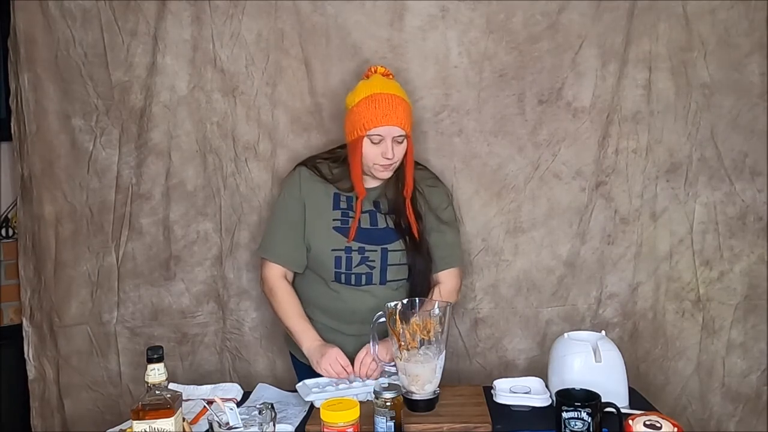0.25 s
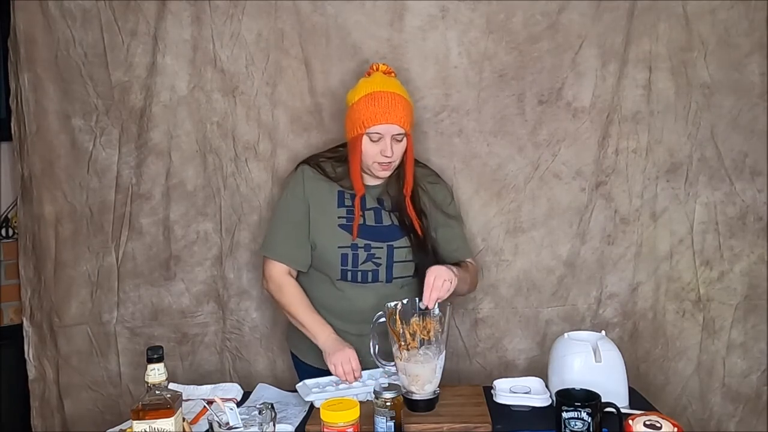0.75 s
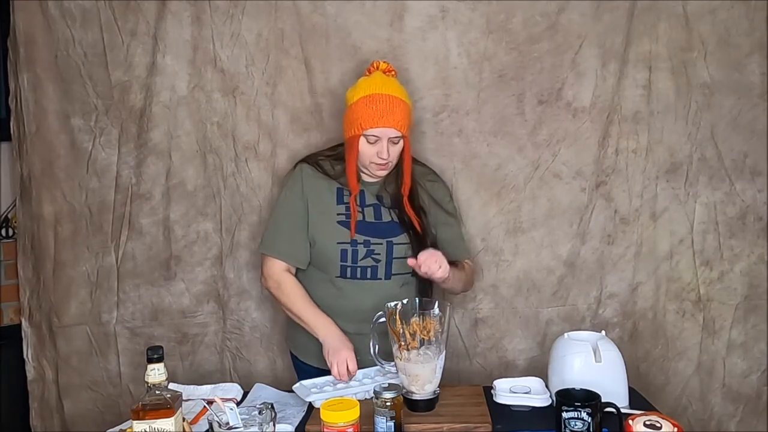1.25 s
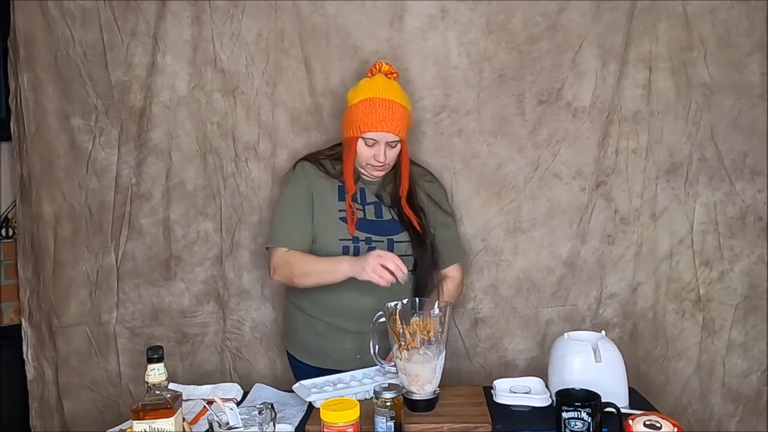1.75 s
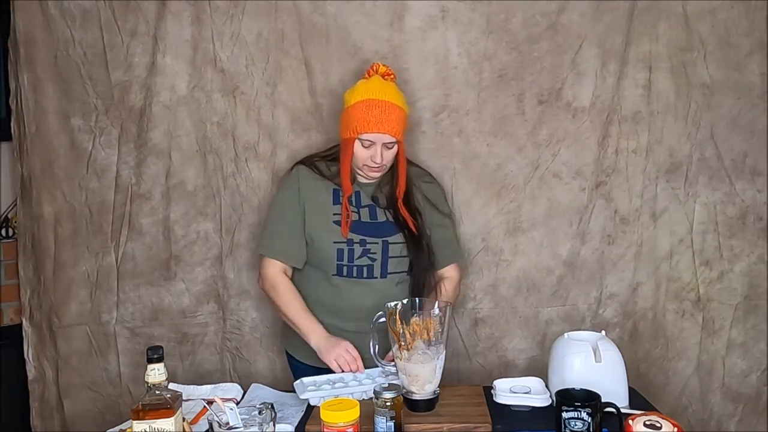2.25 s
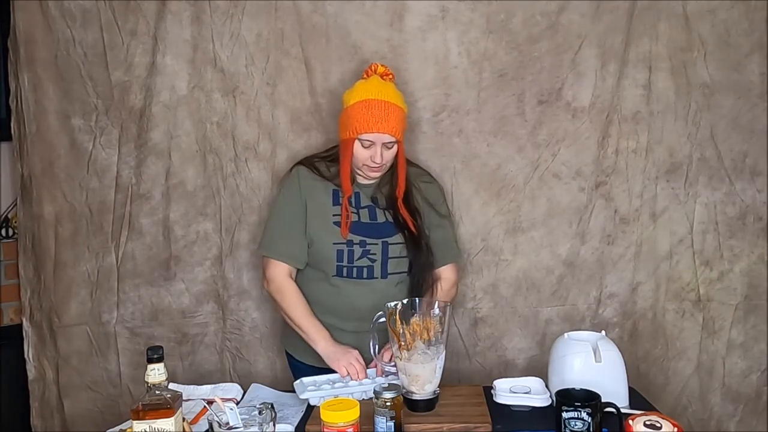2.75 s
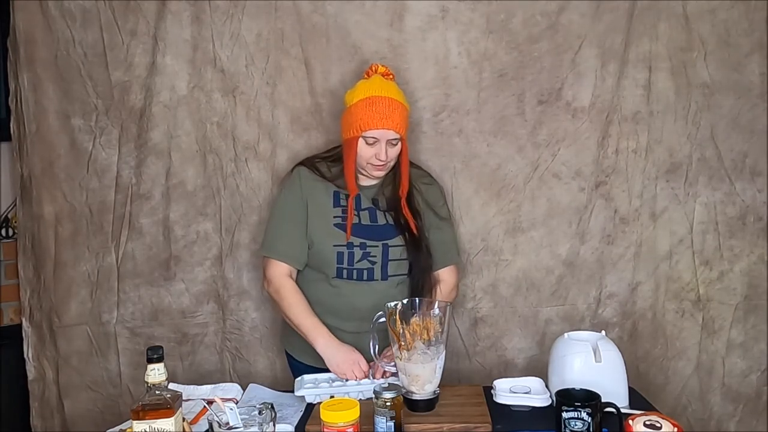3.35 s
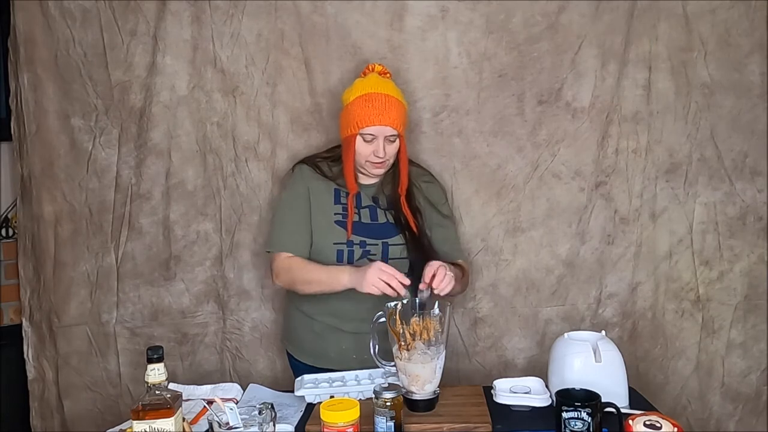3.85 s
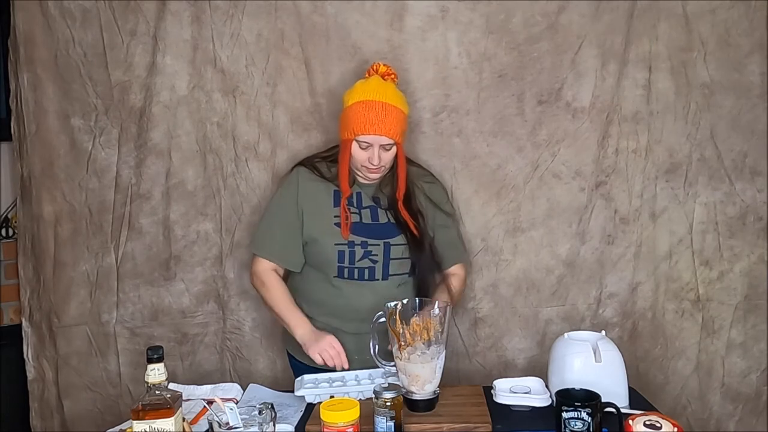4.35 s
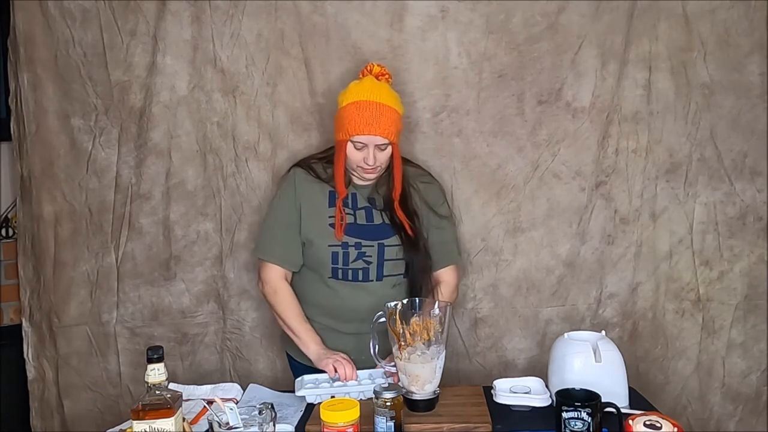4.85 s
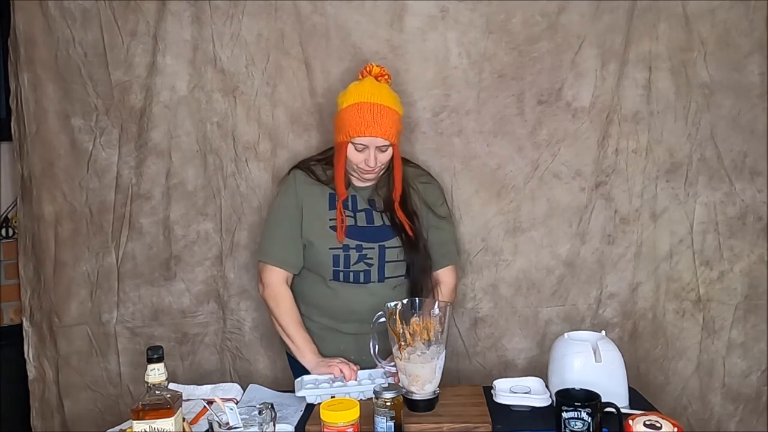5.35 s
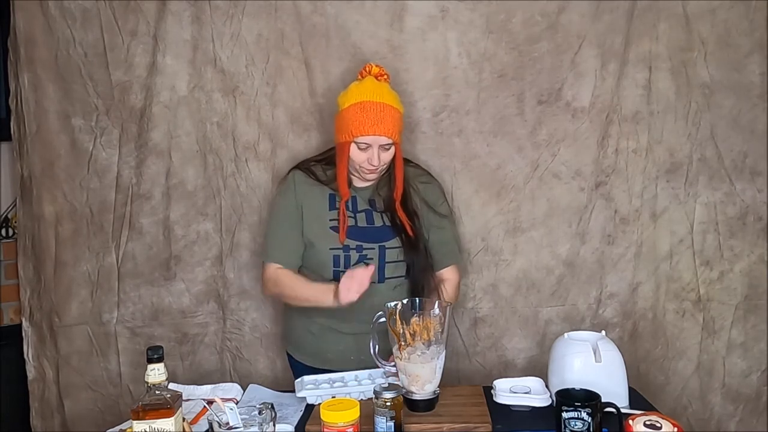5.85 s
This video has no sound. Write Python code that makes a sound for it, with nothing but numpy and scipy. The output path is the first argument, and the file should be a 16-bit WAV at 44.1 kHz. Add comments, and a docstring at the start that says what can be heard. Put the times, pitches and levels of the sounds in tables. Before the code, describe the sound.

Plastic ice tray crackles and ticks under working fingers; three cubes plop hard into a wet, hollow jar, in a small humming kitchen.

```python
"""Ice cubes are pried out of a plastic tray and dropped into a part-filled blender jar, in a small kitchen.
The tray clicks, crunches and scrapes: impacts and stick-slip, as pulses and noise, excite its resonances.
Three times a cube lands hard in the jar, where a strike, a splash and ringing air pockets overlap;
weaker contacts follow each landing. A low appliance hum and dull air noise lie under it all.
A diffuse echo surrounds the handling, and two close microphones hear the scene."""
import sys
import numpy as np
from scipy import signal
from scipy.fft import rfft, irfft
from scipy.io import wavfile

SR = 44100
rng = np.random.default_rng(int(sys.argv[2]) if len(sys.argv) > 2 else 0)


def put_to_file(sound):
    """Save the sound as 16-bit audio at rate SR, in the file named by the first command-line argument."""
    columns = np.atleast_2d(sound).T  # one column per channel
    safe = np.clip(columns, -1, 1)
    whole_steps = np.round(safe * 32767)
    wavfile.write(sys.argv[1], SR, whole_steps.astype(np.int16))


N = 268569
SIZE = 8192  # samples of a short sound
T, HZ = np.arange(SIZE) / SR, np.fft.rfftfreq(SIZE, 1 / SR)

# loudest knocks of ice in the tray:
# (time [s], relative level [dB], relative body gain [dB], relative treble gain [dB])
KNOCKS = [(0.186, -25, -5.5, -18), (0.373, -30.5, -4, -21), (0.4, -18.5, -5.5, -15),
          (0.521, -27.5, -8.5, -37), (0.589, -20.5, -2.5, -17.5), (0.613, -15, -10, -17.5),
          (0.751, -34.5, -5, -19), (0.859, -26.5, -6.5, -34), (0.902, -31, 19, -33),
          (1.136, -26.5, -30, -24), (1.271, -25, 1, -20.5), (1.282, -26, -15.5, -17.5),
          (1.346, -27.5, -16, -36), (1.409, -31, -19, -27), (2.476, -28, -12, -11.5), (2.509, -23, -9, -45),
          (2.537, -24.5, -15, -9.5), (2.615, -24, -22.5, -27), (2.656, -27.5, -15.5, -21),
          (2.76, -29, -13, -20), (2.96, -33.5, -28, -24), (3.014, -26.5, -17.5, -28),
          (3.231, -32.5, -8.5, -13), (3.321, -30.5, -7, -16), (3.544, -34.5, -10, -22),
          (3.682, -34, -23, -9), (4.775, -31.5, -13.5, -12.5), (4.913, -18.5, -29, -23.5),
          (5.066, -10.5, -14.5, -13), (5.094, -13, -6.5, -19), (5.12, -19, -17, -17.5),
          (5.279, -19.5, -22, -22), (5.323, -18.5, -17, -19), (5.384, -15.5, -16, -27),
          (5.514, -23, -28.5, -27), (5.636, -29.5, -16.5, -45)]
# a cube falls into the jar, or bobs up and knocks again; the row at 4.274 s is a faint bright tick,
# likely ice slipping in the fingers: (time [s], relative level [dB],
# splash length [s], relative treble tilt [dB per octave], relative plop level [dB])
JAR_EVENTS = [(1.0756, -18, .013, -1, -10), (1.205, -40, .01, -4, -9), (1.382, -35.5, .014, -3, -12),
              (2.0109, -14.5, 0.038, -.5, -12.5), (2.118, -34.5, 0.0027, -3.5, -16),
              (2.171, -44, 0.0082, -3, -5), (2.235, -44.5, 0.0093, -7, -16), (4.07, -13, .041, 0, -7),
              (4.141, -28.5, 0.06, -3.5, -11), (4.213, -25, 0.016, -6, -16), (4.274, -37, 0.0049, 2.5, -16)]
# broad spectrum of the tray: (frequency [Hz], relative gain [dB])
TRAY_SPECTRUM = [(100, -13), (250, -16.5), (450, -17), (680, -16), (950, -0.5), (1400, -0.5), (1950, -1.5),
                 (2600, -3), (3700, -5), (5000, -3.5), (6500, -10.5), (9000, -13.5), (12000, -23.5),
                 (15500, -39)]
# resonances of the tray: (frequency [Hz], width [Hz], gain above the broad spectrum [dB])
TRAY_RESONANCES = [(1025, 9.6, 4), (1100, 41, 3.5), (1377, 98, 4), (1536, 140, 0), (2380, 230, 2.5),
                   (3250, 32, 6), (3160, 120, 3.5), (4540, 270, 2), (4960, 140, -1), (5300, 80, 0),
                   (8700, 520, 4)]


def amp(db):
    """Level law: decibels to amplitude gain."""
    return 10 ** (np.asarray(db) / 20)


def unit(x):
    """Energy normalisation: scales the sum of squares to one."""
    return x / np.sqrt(np.sum(x ** 2) + 1e-20)


def read(points, hz):
    """Logarithmic frequency scale: interpolates a table along it."""
    f, value = np.transpose(points)
    return np.interp(np.log(hz + 1), np.log(f), value)


def add(mix, s, sound):
    """Superposition: mixes a sound in at time s."""
    part = mix[max(round(s * SR), 0):][:len(sound)]
    part += sound[:len(part)]


def fade(t60, t=T):
    """Exponential damping: falls by 60 dB in t60 seconds."""
    return np.exp(-np.log(1000) * t / np.maximum(t60, 1e-4))


def body(spectrum, modes):
    """Modal response: the gain in dB of a broad spectrum with resonance peaks on top."""
    peaks = sum(db / (1 + (2 * (HZ - hz) / width) ** 2) for hz, width, db in modes)
    return read(spectrum, HZ) + peaks


def colour(x, db):
    """Causality: passes x through the minimum-phase filter that has this gain in dB."""
    log_gain = np.log(amp(np.r_[db, db[-2:0:-1]]))
    # log gain and phase of a minimum-phase filter are a Hilbert pair
    response = np.fft.ifft(np.exp(np.conj(signal.hilbert(log_gain)))).real
    return signal.oaconvolve(x, response[:SIZE // 2])[:len(x)]


def tilt(db_per_octave):
    """Contact hardness: a harder contact tilts the spectrum towards the treble."""
    return db_per_octave * np.log2(np.clip(HZ, 700, 12000) / 2500)


def spot(depth_db, count=14):
    """Place-dependent mode excitation: each place on the tray has its own random gain in dB."""
    places = np.linspace(np.log(800), np.log(12000), count)
    return np.interp(np.log(HZ + 1), places, depth_db * rng.standard_normal(count))


def grains(size, per_s, spread_db):
    """Random point process: tiny slips at random moments, a few much larger than the rest."""
    levels = spread_db * np.minimum(rng.exponential(1, size), 4)
    pulses = amp(levels) * rng.choice([-1, 1], size)
    return pulses * (rng.random(size) < per_s / SR)


def blow(rattle_db, rattle_t60, swell_s):
    """Impact: one sharp contact, then the dense rattle that spreads through the struck wall and dies."""
    rattle = rng.standard_normal(SIZE) * fade(rattle_t60) * (1 - np.exp(-T / swell_s))
    return unit(signal.unit_impulse(SIZE) + amp(rattle_db) * unit(rattle))


def run_of_slips(length, per_s):
    """Stick-slip: slips build up, go on for a given time [s] and then die away."""
    release = fade(0.041, np.maximum(T - length, 0))
    grip = (1 - np.exp(-T / 0.006)) * release
    return unit(grains(SIZE, per_s, spread_db=2.5) * grip)


def note(hz, t60, rise_s, glide=0):
    """Damped oscillator: a dying tone with a soft start; its pitch may rise by a share per second."""
    tone = np.sin(2 * np.pi * hz * (T + glide * T ** 2 / 2))
    return tone * fade(t60) * (1 - np.exp(-T / rise_s))


def noise_pair(size):
    """Diffuse-field coherence: noise spectra at two close microphones, and their frequencies [Hz]."""
    # likeness of the microphones: (frequency [Hz], coherence [0-1])
    likeness = [(60, 0.58), (200, 0.82), (700, 0.4), (1400, 0.86), (2800, 0.21), (5500, 0.53), (11000, .3)]
    hz = np.fft.rfftfreq(size, 1 / SR)
    same = np.clip(read(likeness, hz), 0, 1)
    common, apart = rfft(rng.standard_normal((2, size)))
    opposed = np.array([[1], [-1]]) * apart * np.sqrt((1 - same) / 2)
    return common * np.sqrt((1 + same) / 2) + opposed, hz


def background(air_db=-58, hum_hz=58.2, waver_db=-17, waver_hz=5):
    """Tonal and broadband noise: a motor hum wavers by narrow-band noise over the dull air of the room."""
    # air noise: (frequency [Hz], relative level [dB])
    air_spectrum = [(20, -8), (30, -1.5), (42, -11), (75, -6.5), (110, -10.5), (190, -13), (260, -22),
                    (390, -25), (600, -31.5), (1300, -35), (2200, -39.5), (5000, -46.5), (9000, -53),
                    (15000, -79.5)]
    # motor hum: (time [s], level [dB])
    hum_level = [(0.0, -45.5), (1.54, -48), (4.9, -45), (5.83, -48), (6.09, -46)]
    # weak companion tones: (frequency [Hz], level [dB])
    hum_lines = [(26.9, -72), (117.5, -74), (388, -79.5)]
    t = np.arange(N) / SR
    noise, hz = noise_pair(N)
    air = amp(air_db) * unit(irfft(noise * amp(read(air_spectrum, hz)), N)) * np.sqrt(2 * N)
    narrow_band = np.exp(-((hz - hum_hz) / (2 * waver_hz)) ** 2)
    waver = unit(irfft(noise[0] * narrow_band, N)) * np.sqrt(N)
    motor = np.sqrt(2) * np.sin(2 * np.pi * hum_hz * t) + amp(waver_db) * waver
    lines = sum(amp(db) * np.sqrt(2) * np.sin(2 * np.pi * (f * t + rng.random())) for f, db in hum_lines)
    return air + lines + motor * amp(np.interp(t, *np.transpose(hum_level)))


def kitchen(x, wet_db=0, build_s=0.0017, drift_per_s=35, count=7):
    """Reverberation: table and walls return a diffuse decaying echo, whose pattern keeps changing."""
    # reverberation time: (frequency [Hz], t60 [s])
    reverberation = [(150, .3), (600, .21), (1500, .21), (4000, .195), (9000, .165), (15000, .12)]
    out, size = np.zeros((2, N)), SR * 2 // 5
    for k in range(count):
        hz, t, z = signal.stft(irfft(noise_pair(size)[0], size), SR, nperseg=256)
        decay = fade(read(reverberation, hz)[:, None], t)
        tail = signal.istft(z * decay * (1 - np.exp(-t / build_s)), SR, nperseg=256)[1]
        # neighbouring echo patterns cross-fade at constant power
        turn = (drift_per_s * np.arange(N) / SR - k) % count
        share = np.sin(np.pi / 2 * np.minimum(turn, 2))
        out += signal.fftconvolve((x * share)[None], unit(tail) * np.sqrt(2), axes=1)[:, :N]
    return amp(wet_db) * out


def fingers(level_db=14):
    """Sliding friction: wet ice slips on skin in a soft swell of fine noise with a high resonance."""
    # slips: (time [s], relative level [dB], swell length scale [s])
    finger_slips = [(1.915, -59.5, 0.01), (4.355, -61.5, 0.014), (5.829, -42, 0.019), (5.933, -47.5, 0.054)]
    # friction spectrum: (frequency [Hz], relative gain [dB])
    wet_ice = [(1500, -20), (4200, -12), (5000, 0), (5700, -14), (7500, -12), (10000, -22), (15000, -38)]
    out = np.zeros(N)
    for s, db, length in finger_slips:
        swell = (T / length) ** 2 * np.exp(-4 * T / length)
        friction = colour(rng.standard_normal(SIZE) * swell, read(wet_ice, HZ))
        add(out, s, amp(db + level_db) * unit(friction))
    return out


def tray_bumps(level_db=14, t60=0.091):
    """Forced response: the table answers a push on the tray with a short, dull thud."""
    # pushes: (time [s], relative level [dB])
    pushes = [(.521, -40.5), (0.575, -40), (0.613, -33.5), (1.288, -39), (2.988, -43.5), (4.567, -46),
              (5.09, -33.5), (5.391, -39.5)]
    dull = read([(70, -27.0), (130, 1.5), (270, -1.5), (450, -10.5), (800, -23.5), (2000, -49.0)], HZ)
    out = np.zeros(N)
    for s, db in pushes:
        thud = colour(rng.standard_normal(SIZE) * fade(t60), dull)
        add(out, s, amp(db + level_db) * unit(thud))
    return out


def plops(level_db=1, cycles=40, size_spread=0.028, closes_at=.75, gulp_hz=245, gulp_db=-22.5):
    """Bubble resonance: an air pocket closes late in each splash and rings upward; the jar gulps low."""
    # air pocket behind a sinking cube: (nominal frequency [Hz], relative level [dB])
    pocket = [(572, 1), (776, -15), (1010, -8)]
    out = np.zeros(N)
    chances = rng.standard_normal((len(JAR_EVENTS), len(pocket)))
    for (s, db, length, _, plop_db), chance in zip(JAR_EVENTS, chances):
        for (hz, share_db), detune in zip(pocket, 1 + size_spread * chance):
            ring = note(hz * detune, t60=cycles / hz, rise_s=0.0048, glide=0.47)
            # closes_at is the share of the splash that passes before the liquid covers the cube
            add(out, s + closes_at * length, amp(db + plop_db + share_db + level_db) * ring)
        gulp = note(gulp_hz, t60=cycles / gulp_hz, rise_s=0.0079)
        # longer splashes gulp louder; 0.033 s is the reference length
        add(out, s + 0.0077, amp(db + gulp_db) * length / 0.033 * gulp)
    return out


def jar(level_db=14, splash_db=3, bubbles_db=-8, settle_db=-28, count=10):
    """Impact on a resonant vessel: strike, splash and small bubbles sound, then the froth settles."""
    # broad spectrum of the splash: (frequency [Hz], relative gain [dB])
    splash_spectrum = [(100, -10.5), (250, -17), (420, -8.5), (650, -1.5), (1000, -3.5), (1300, -7),
                       (1750, -1.5), (2300, -4.5), (3400, -6), (5200, -9.5), (6500, -15), (9000, -20),
                       (12000, -35), (15500, -47)]
    # resonances of the jar: (frequency [Hz], width [Hz], gain above the broad spectrum [dB])
    jar_resonances = [(246, 35, 6), (580, 70, 7), (770, 60, 3), (1000, 80, 5), (1650, 60, 5), (1830, 70, 3),
                      (2390, 110, 5), (3060, 100, 3), (3470, 70, 4)]
    out, t = np.zeros(N), np.arange(SR) / SR
    hollow = body(splash_spectrum, jar_resonances)
    for s, db, length, slope, _ in JAR_EVENTS:
        impact = blow(rattle_db=5.0, rattle_t60=0.018, swell_s=.002)
        strike = unit(colour(impact, hollow + tilt(slope + 4.2)))
        splash = unit(colour(run_of_slips(length, per_s=1700), hollow + tilt(slope - .8)))
        bubbles = np.zeros(SIZE)
        for when, pitch in rng.random((count, 2)):
            add(bubbles, .006 + when * length, note(510 * 1.8 ** pitch, .02, rise_s=.001))
        event = strike + amp(splash_db) * splash + amp(bubbles_db) * unit(bubbles)
        add(out, s, amp(db + level_db) * unit(event))
        froth = colour(rng.standard_normal(SR) * fade(1.6, t), hollow + tilt(-3))
        add(out, s, amp(db + level_db + settle_db) * unit(froth))
    return out


def handling_force():
    """Friction follows force: how hard the fingers work in the tray, as a gain over time."""
    # one list for each spell of sliding: (time [s], relative level [dB])
    spells = [
        [(0.0, -49.5), (0.3, -55.5), (0.56, -46), (0.72, -54), (1.254, -51.5), (1.372, -52), (1.504, -61.5),
         (1.58, -99)],
        [(2.55, -46.5), (2.7, -52), (2.85, -49.5), (3.2, -52), (3.62, -54), (3.846, -59), (3.92, -102)],
        [(5.2, -36), (5.29, -67.5), (5.5, -40), (5.78, -61.5)],
    ]
    t = np.arange(N) / SR
    return sum(amp(np.interp(t, *np.transpose(rows), left=-150, right=-150)) for rows in spells)


def tray_scrapes(level_db=-8.0, count=6):
    """Dry friction: short, gritty slips at several places on the tray crowd under the fingers."""
    tray, friction = body(TRAY_SPECTRUM, TRAY_RESONANCES) + tilt(0.65), np.zeros(N)
    for _ in range(count):
        starts = abs(grains(N, per_s=24, spread_db=4))
        slips = signal.oaconvolve(starts, fade(.035) * (1 - np.exp(-T / .002)))[:N]
        grit = slips * grains(N, per_s=1200, spread_db=3.5)
        friction += unit(colour(grit, tray + spot(depth_db=4, count=22)))
    return amp(level_db) * handling_force() * unit(friction) * np.sqrt(N)


def tray_ticks(level_db=-7, count=3):
    """Random impacts: jostling cubes knock at random moments, scaled by the handling force."""
    tray, force, ticks = body(TRAY_SPECTRUM, TRAY_RESONANCES), handling_force(), np.zeros(N)
    for _ in range(count):
        impact = blow(rattle_db=4.5, rattle_t60=.018, swell_s=0.00072)
        knock = colour(impact, tray + spot(depth_db=2))
        jolts = force * unit(grains(N, per_s=9, spread_db=3)) * np.sqrt(N / count)
        ticks += signal.oaconvolve(jolts, unit(knock))[:N]
    return amp(level_db) * ticks


def tray_rings(level_db=0, cycles=46):
    """Damped resonance: wall pops and sharp clicks ring on one note, dying by 60 dB in 46 cycles."""
    # wall pops, and short high rings that belong to sharp clicks, such as the one at 0.613 s:
    # (time [s], level [dB], frequency [Hz])
    rings = [(.379, -32, 1184), (.402, -36.5, 1250), (0.6134, -11.5, 2610), (.858, -30, 1078),
             (1.1352, -29, 3270), (2.484, -32, 1150), (2.532, -32.5, 1084), (3.232, -30, 2150),
             (4.566, -44, 983), (4.914, -19, 3170), (5.095, -23.5, 973), (5.104, -24, 928),
             (5.217, -38, 995)]
    out = np.zeros(N)
    for s, db, hz in rings:
        add(out, s, amp(db + level_db) * note(hz, cycles / hz, rise_s=0.00017))
    return out


def tray_crunches(level_db=15):
    """Stick-slip: ice grinds against the plastic as a cube comes free, each time at another place."""
    # runs of slips: (time [s], relative level [dB], length [s], treble tilt [dB per octave])
    slip_runs = [(0.131, -34, 0.04, -2), (.545, -25, 0.051, -3.5), (0.745, -38.5, 0.024, -5.5),
                 (.599, -22, 0.033, 0), (1.017, -27.5, 0.098, -3.5), (2.479, -21.5, 0.026, 0),
                 (2.534, -30.5, 0.02, -1), (2.802, -31.5, 0.031, 3), (3.033, -39, .05, -2.5),
                 (3.135, -36.5, 0.032, 3.5), (3.37, -33.5, 0.025, -1.5), (3.569, -47, 0.014, 3),
                 (3.798, -45.5, 0.022, -5), (4.664, -33, 0.04, 0.5), (4.887, -33.5, 0.02, 3.5),
                 (5.044, -14, 0.018, 2.5), (5.07, -20, 0.02, -5.5), (5.27, -26.5, 0.014, -5.5),
                 (5.382, -17.5, 0.0081, 0), (5.5, -30, 0.032, 10.5), (5.676, -38, 0.0373, -0.5)]
    out, tray = np.zeros(N), body(TRAY_SPECTRUM, TRAY_RESONANCES)
    for s, db, length, slope in slip_runs:
        shape = tray + tilt(slope) + spot(depth_db=1.2, count=20)
        crunch = colour(run_of_slips(length, per_s=1400), shape)
        add(out, s, amp(db + level_db) * unit(crunch))
    return out


def ice_snaps(level_db=25.5, landing_db=0, hard_landing_db=-21, t60=0.021):
    """Brittle fracture: cracking ice gives a bright noise burst at each knock and each hard landing."""
    bright = read([(600, -27.0), (1500, 0.5), (4500, 3.5), (6500, -5.5), (9500, -3.5),
                   (12000, -17.0), (15500, -22.0)], HZ)
    out = np.zeros(N)
    cracks = [(s, db + high_db + level_db) for s, db, _, high_db in KNOCKS]
    cracks += [(s, db + landing_db) for s, db, *_ in JAR_EVENTS if db > hard_landing_db]
    for s, db in cracks:
        snap = colour(rng.standard_normal(SIZE) * fade(t60), bright)
        add(out, s, amp(db) * unit(snap))
    return out


def tray_clicks(level_db=13, body_db=11, treble_db=11, bass_db=-5, follow=0.91, sharp_db=-22):
    """Impact excitation: knocks ring the tray's modes; gentle ones swell more slowly and rattle longer."""
    out, tray = np.zeros(N), body(TRAY_SPECTRUM, TRAY_RESONANCES)
    for s, db, low_db, high_db in KNOCKS:
        contact = read([(150, bass_db), (700, low_db + body_db), (1400, low_db + body_db),
                        (3300, 0.018), (8000, high_db + treble_db)], HZ)
        # drag runs from 0 for a hard knock to 1 for a gentle one; it is one half at sharp_db
        drag = 1 / (1 + amp(db - sharp_db) ** 2)
        knock = blow(rattle_db=11.5 + 3.1 * drag, rattle_t60=0.012 + 0.021 * drag,
                     swell_s=.0007 + 0.0036 * drag)
        # follow is the share of the contact's gain that colours the knock
        shape = tray + follow * contact + spot(depth_db=2)
        add(out, s, amp(db + level_db) * unit(colour(knock, shape)))
    return out


def scene(jar_echo_db=-2, crack_echo_db=-6):
    """Direct and reverberant sound: jar, cracks, rings and plops send less into the echo than the handling."""
    handling = tray_clicks() + tray_crunches() + tray_scrapes() + tray_ticks() + tray_bumps() + fingers()
    direct = ice_snaps() + tray_rings() + plops()
    drops = jar()
    echo = kitchen(handling + amp(jar_echo_db) * drops + amp(crack_echo_db) * direct)
    return handling + direct + drops + echo + background()


def record(dry, lag_s=.000026, edge_hz=15500):
    """Interchannel differences: the left microphone hears later and in another colour; then a low-pass."""
    # balance of the microphones: (frequency [Hz], left minus right [dB])
    balance = [(60, .9), (200, -.4), (700, 0), (1300, .5), (2500, 1.6), (5000, .9), (9000, -2.2),
               (15000, -2.2)]
    hz = np.fft.rfftfreq(N, 1 / SR)
    gains = amp(np.array([[.5], [-.5]]) * read(balance, hz))
    delays = np.exp(-2j * np.pi * hz * np.array([[lag_s], [0]]))
    heard = irfft(rfft(dry) * gains * delays, N)
    low_pass = signal.firwin(255, edge_hz, window=("kaiser", 9), fs=SR)
    return signal.oaconvolve(heard, low_pass[None], "same")


dry = scene()
out = record(dry)
put_to_file(out)
```